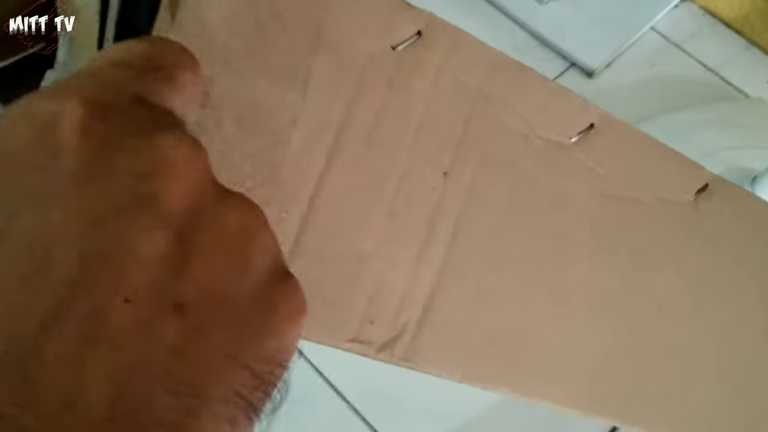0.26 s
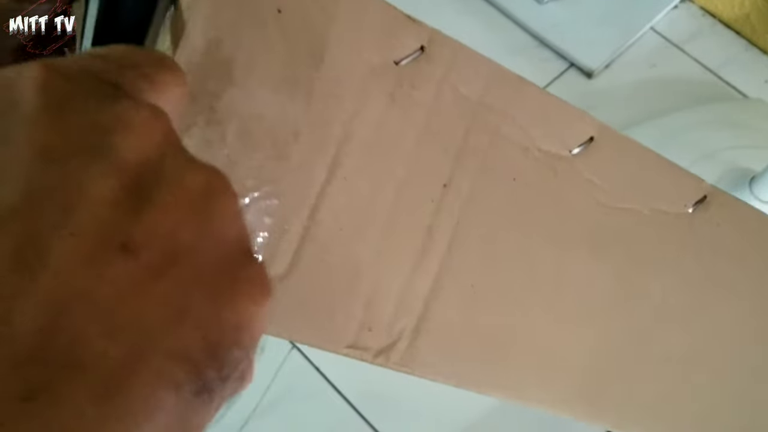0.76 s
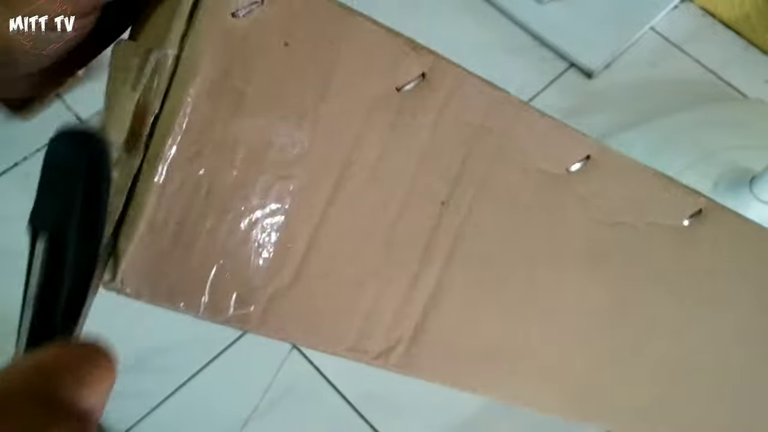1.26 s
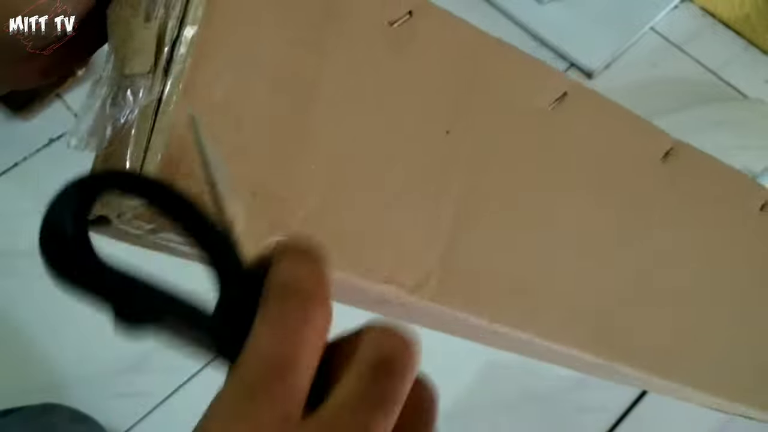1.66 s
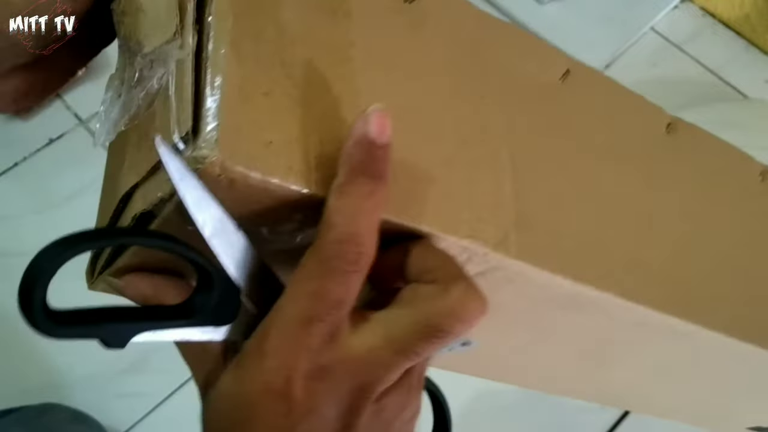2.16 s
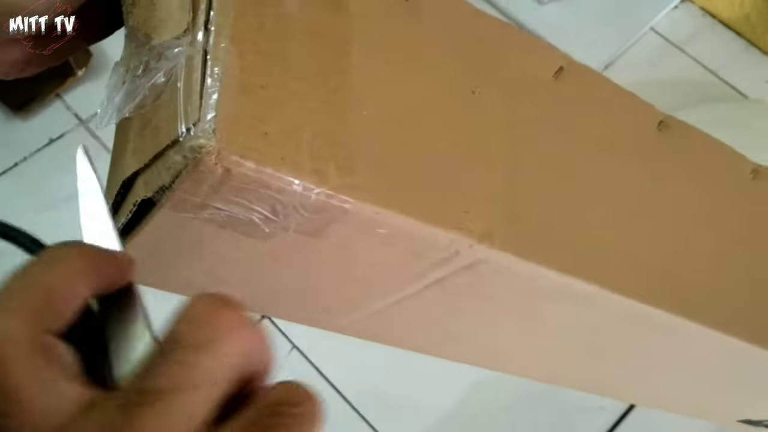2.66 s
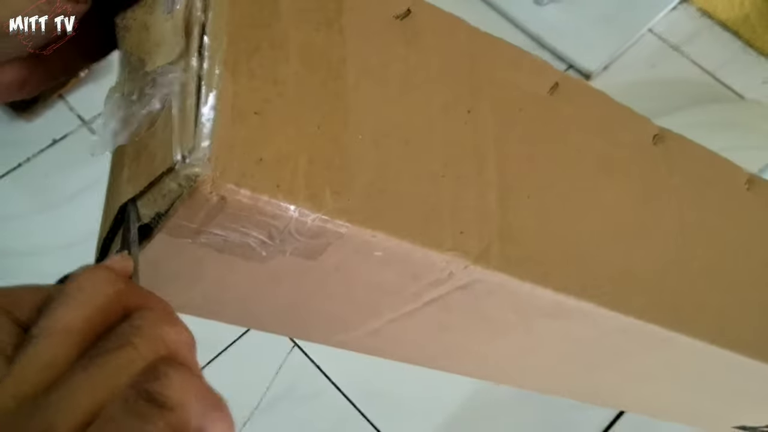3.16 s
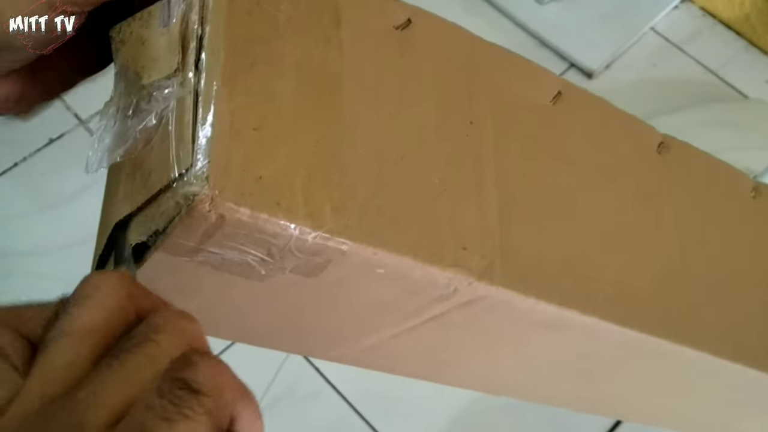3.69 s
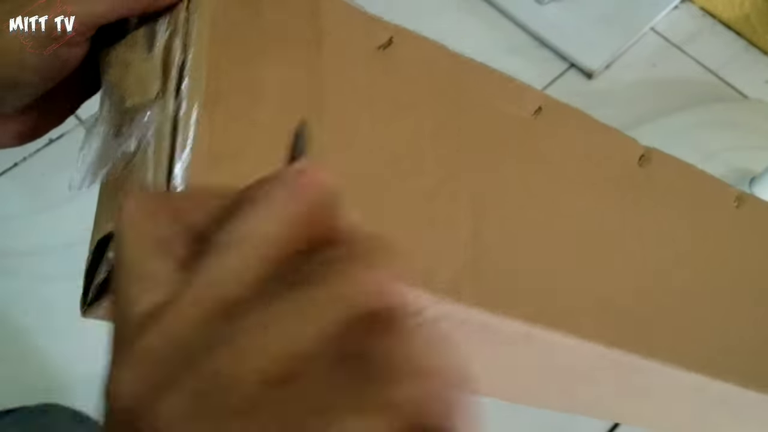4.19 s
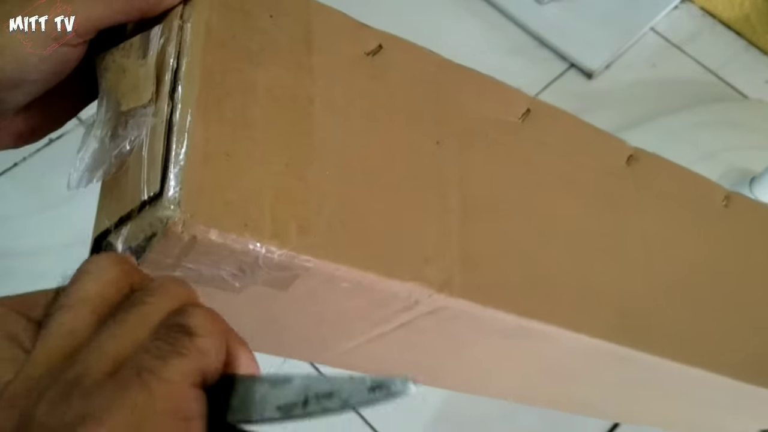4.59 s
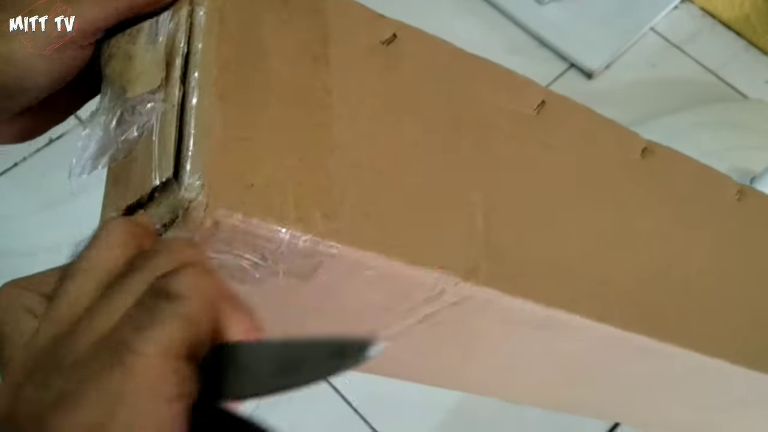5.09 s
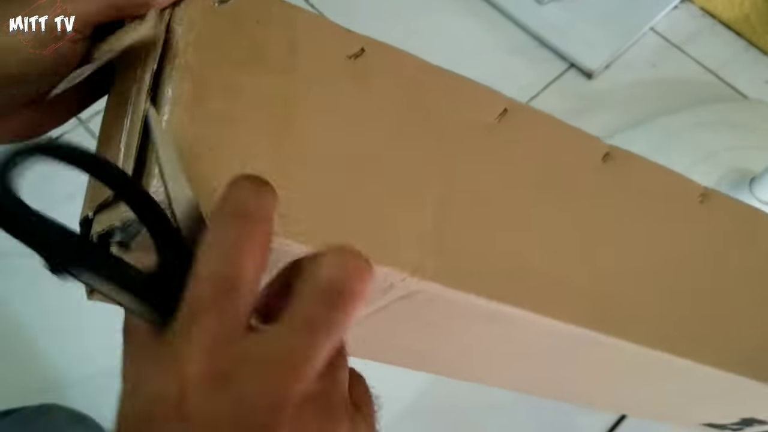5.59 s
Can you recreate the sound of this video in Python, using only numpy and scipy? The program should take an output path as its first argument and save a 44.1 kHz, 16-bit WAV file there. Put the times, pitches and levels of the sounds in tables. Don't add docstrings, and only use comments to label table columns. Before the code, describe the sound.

Scissors work at a taped cardboard box up close: hollow knocks, papery scrapes, crisp tape snaps and short rips in a tiled room.

```python
import sys
import numpy as np
from scipy import signal
from scipy.fft import rfft, irfft, next_fast_len
from scipy.io import wavfile
from scipy.ndimage import map_coordinates

SR = 44100
rng = np.random.default_rng(int(sys.argv[2]) if len(sys.argv) > 2 else 0)


def volts_from_db(level):
    exponent = np.asarray(level, float) / 20
    return 10 ** exponent


def store_pcm(level_fs):
    pcm = np.round(np.clip(level_fs, -1, 1) * 32767).astype(np.int16)
    wavfile.write(sys.argv[1], SR, np.atleast_2d(pcm).T)


N = 257984
SECONDS = np.arange(N) / SR


def unit(x):
    return x / np.sqrt(np.mean(x ** 2) + 1e-20)


def along(points, hz):
    f, v = np.transpose(points)
    return np.interp(np.log(hz + 1), np.log(f + 1), v)


def over_time(points):
    return np.interp(SECONDS, *np.transpose(points))


def wobble(rate):
    knots = rng.standard_normal(int(N * rate / SR) + 4)
    return map_coordinates(knots, [np.arange(N) * rate / SR])


def filtered(x, response):
    m = next_fast_len(N + SR // 2)
    return irfft(rfft(x, m) * response(np.fft.rfftfreq(m, 1 / SR)), m)[..., :N]


def coloured_noise(curve):
    return unit(filtered(rng.standard_normal((2, N)), lambda hz: volts_from_db(along(curve, hz))))


def resonances(modes):
    def response(f):
        total = 0
        for k, (centre, width, db) in enumerate(modes):
            damping = 1j * f * width
            total = total + (-1) ** k * volts_from_db(db) * damping / (centre ** 2 - f ** 2 + damping)
        return total
    return response


# frequency in Hz, correlation from -1 to 1.
PORT_LIKENESS = [(60, 1), (130, 0.88), (290, 0.8), (640, 0.36), (1410, -0.19), (3100, 0.16), (6820, -0.13),
                 (15000, 0.11)]


def diffuse(pair):
    def mid_side(hz):
        turn = np.arccos(np.clip(along(PORT_LIKENESS, hz), -1, 1)) / 2
        return np.array([np.cos(turn), np.sin(turn)])
    mid, side = filtered(pair, mid_side)
    return np.array([mid + side, mid - side])


# frequency in Hz, density in dB per Hz.
RUMBLE_SPECTRUM = [(15, -65), (25, -42), (29, -29), (35, -8.5), (60, 5), (112, -3.5), (134, -27),
                   (160, -65), (193, -6), (216, -24), (251, -15), (348, -39), (400, -31), (520, -52),
                   (880, -120)]
# frequency in Hz, density in dB per Hz.
HISS_SPECTRUM = [(180, -25), (300, 3.5), (537, -4.5), (749, -7), (1210, -6), (1460, -8), (2360, -10),
                 (3190, -15), (6100, -22.5), (16000, -20.5)]
# time in seconds, rumble level in dB.
RUMBLE_LEVEL = [
    (0, -50.5),
    (2.9, -52),
    (3.3, -52.5),
    (3.9, -52.5),
    (4.5, -55),
    (5.3, -48),
    (5.85, -52),
]


def background():
    rumble_swing_db, hiss_db = 1.4, -61.5
    swell = volts_from_db(over_time(RUMBLE_LEVEL) + rumble_swing_db * wobble(1.81))
    drift = volts_from_db(.6 * wobble(2.5))
    rumble = swell * coloured_noise(RUMBLE_SPECTRUM)
    hiss = volts_from_db(hiss_db) * drift * coloured_noise(HISS_SPECTRUM)
    return diffuse(rumble + hiss)


# frequency in Hz, t60 in seconds.
TILE_DECAY = [(100, 0.24), (500, 0.48), (2000, 0.36), (6000, 0.3), (14000, 0.25)]


def room(x):
    out, hop = np.zeros((2, N + 2 * SR)), SR // 4
    for start in range(0, N, hop):
        hz, t, z = signal.stft(rng.standard_normal((2, SR // 2)), SR, nperseg=256)
        decay = volts_from_db(-60 * t / along(TILE_DECAY, hz)[:, None])
        tail = signal.istft(z * decay, SR, nperseg=256)[1]
        wet = signal.fftconvolve(x[None, start:start + hop], tail / np.linalg.norm(tail[0]), axes=1)
        out[:, start + 130:][:, :wet.shape[1]] += wet
    return diffuse(out[:, :N])


# delay in seconds, left level in dB, right level in dB.
NEAR_ECHOES = [
    (.0011, -10, -28),
    (.0023, -21.5, -7),
    (.0037, -22, -56),
    (.0062, -19.5, -18),
]


def placed(x, lag, shade_share):
    side = np.array([[1], [-1]])
    shade_db = [(100, 0.32), (600, 0.32), (4000, 4.2), (12000, 1.3)]

    def response(hz):
        shade = volts_from_db(-side * shade_share * along(shade_db, hz))
        direct = shade * np.exp(-1j * np.pi * hz * lag * side)
        echoes = 0
        for s, left, right in NEAR_ECHOES:
            echoes = echoes + volts_from_db([[left], [right]]) * np.exp(-2j * np.pi * hz * (s + side * 0.000215))
        treble = hz / (hz + 900)
        return direct + treble * echoes
    return filtered(x, response)


# frequency in Hz, width in Hz, level in dB.
CAVITY_MODES = [(113.2, 23.5, 3), (185, 35, 1.5), (250, 25, -2.5)]
# frequency in Hz, width in Hz, level in dB.
WALL_MODES = [(317.4, 157, 1.5), (425, 76, 7), (559.4, 60, 3.5), (733, 102, 2), (940, 104, -7.5)]
# frequency in Hz, width in Hz, level in dB.
PAPER_MODES = [(1060, 630, 5), (1413, 550, 9), (1740, 390, 7), (2455, 420, -2), (3200, 1500, -16)]
# start in seconds, peak in dB, wall pitch in Hz, t60 in seconds, fingertip tap in dB.
WALL_KNOCKS = [(0.294, -43.5, 744, 0.021, 0), (0.627, -42.5, 380, 0.081, -8), (0.757, -38, 390, 0.014, 1),
               (1.101, -25.5, 1165, 0.032, -22), (1.209, -31, 947, 0.049, -20),
               (1.349, -22.5, 351, 0.022, -7), (1.963, -28, 308, 0.0042, 1), (2.072, -39.5, 180, 0.075, -7),
               (2.448, -35.5, 425, 0.0073, 2.5), (3.045, -48.5, 192, 0.017, 2),
               (3.105, -38, 180, 0.014, -10), (3.615, -36, 354, 0.0083, -0.5), (4.148, -27, 246, 0.072, -6),
               (4.172, -21.5, 452, 0.058, 1.5), (4.219, -21, 160, 0.047, -6.5), (4.288, -25, 278, 0.054, 4),
               (4.635, -62, 593, 0.016, 6), (4.9, -33, 420, 0.036, -16), (5.254, -28.5, 175, 0.12, 1.5),
               (5.268, -20, 582, 0.037, -0.5), (5.301, -50, 188, 0.025, -15),
               (5.567, -31.5, 463, 0.0038, -2), (5.802, -38, 250, 0.12, -20.5)]


def knocks():
    out, shake, t = np.zeros(N + SR), np.zeros(N + SR), np.arange(SR // 4) / SR
    rattle_db, rattle_t60_s = -0.5, 0.012
    contact = np.clip((t - .0008) / 0.001895, 0, 1)
    push = 1.62 * np.sin(2 * np.pi * contact) * (0.33 + 0.84 * contact)
    nail = 0.46 * np.exp(-((t - .001) / 0.0001) ** 2)
    tap = push + nail
    stiff = 0.0007 * (1 - np.exp(-t / 0.0013))
    noises = rng.standard_normal((len(WALL_KNOCKS), len(t)))
    for (s, db, hz, t60, tap_db), noise in zip(WALL_KNOCKS, noises):
        fade = volts_from_db(-60 * t / max(t60, .004)) * (1 - np.exp(-t / 0.00093))
        bend = np.sin(2 * np.pi * hz * (t + stiff))
        at = round(s * SR)
        out[at:][:len(t)] += volts_from_db(db + 1) * (fade * bend + volts_from_db(tap_db) * tap)
        shake[at:][:len(t)] += volts_from_db(db + rattle_db - 60 * t / rattle_t60_s) * noise
    rattle = filtered(shake[:N], resonances(CAVITY_MODES + WALL_MODES + PAPER_MODES[:2]))
    return out[:N] + rattle


def snaps(rows):
    out, t = np.zeros(N + SR), np.arange(SR // 20) / SR
    lead_in_s, t60_s = .0007, 0.0054
    top_end = signal.butter(2, [8800, 15500], "band", fs=SR)
    lead_in = np.clip(t / lead_in_s, 0, 1) ** 2
    fade = lead_in * volts_from_db(-60 * np.clip(t - lead_in_s, 0, 1) / t60_s)
    noises = rng.standard_normal((len(rows), 2, len(t)))
    for (s, db, hz, top_db), (jitter, fray) in zip(rows, noises):
        around_pitch = signal.butter(1, np.multiply((.6, 1.9), hz), "band", fs=SR)
        release = 0.44 * fade * fray
        release[round(lead_in_s * SR)] += 2
        flick = 0.41 * fade * np.sin(2 * np.pi * hz * t + 0.29 * np.cumsum(jitter))
        click = signal.lfilter(*around_pitch, release)
        click += volts_from_db(top_db + 7) * signal.lfilter(*top_end, release)
        out[round((s - .0003) * SR):][:len(t)] += volts_from_db(db + 4.0) * (flick + click)
    return out[:N]


# start in seconds, peak in dB, pitch in Hz, top-end level in dB.
FACE_CREAKS = [
    (0.2944, -42, 2450, -13),
    (0.7456, -34, 2260, -23),
    (1.4194, -28, 2330, -29),
    (1.721, -40, 2340, -11),
    (1.805, -41, 2370, -11),
    (1.9165, -37, 3680, -30),
    (4.0921, -44, 2330, -3.5),
    (5.1753, -37.5, 2840, -23),
]


def face_creaks():
    return snaps(FACE_CREAKS)


# start in seconds, peak in dB,
# film pitch in Hz, top-end level in dB.
FILM_SNAPS = [(0.9642, -45, 2240, 0), (1.0251, -27, 2230, -18), (1.053, -36, 4600, -13),
              (1.1014, -37, 2350, -20), (1.21, -32.5, 2600, -9), (1.2434, -27.5, 4600, -10.5),
              (1.2682, -21, 4380, -28), (1.2724, -27.5, 4040, -1.5), (1.3205, -33, 4030, -21),
              (2.1372, -38.5, 5530, -5), (2.1497, -40, 5400, -4), (2.205, -35, 2700, -10),
              (2.2502, -49, 2310, 14.5), (2.4474, -40, 4500, -20), (4.153, -34, 5370, -14),
              (4.1729, -30, 5900, -17), (4.1805, -17, 4250, -21), (4.905, -36, 3620, -32),
              (4.9374, -36, 4250, -19), (5.2555, -22.5, 3520, -11), (5.2722, -27.5, 5130, -3),
              (5.2763, -19, 4500, -21), (5.2782, -23.5, 4840, -16),
              (0.2226, -46, 2440, -23), (1.495, -21, 3480, -20), (1.6646, -49, 5400, -12),
              (1.842, -37.5, 3760, -12), (2.4, -29.5, 3800, -10.5), (2.7563, -40.5, 3700, -27),
              (3.106, -50, 2710, -1), (3.324, -47.5, 4050, -23), (4.777, -32.5, 3940, -22),
              (5.1194, -34, 3890, -30), (5.4496, -32, 4400, -6.5), (5.5371, -41.5, 5000, -24),
              (5.567, -47, 2250, -32), (5.7797, -39.5, 3480, -11), (5.8158, -39, 3120, -30)]


def tape_cracks():
    return snaps(FILM_SNAPS)


def grit(slips, spread_db, smooth):
    when, size = rng.random(N), rng.standard_normal((2, N))
    struck = when < slips / SR * volts_from_db(5 * wobble(60))
    slip = struck * volts_from_db(spread_db * np.clip(size[0], -2, 2)) * np.sign(size[1])
    return unit(unit(slip) + smooth * rng.standard_normal(N))


# time in seconds, pressure in dB.
GRIP_PRESSURE = [(0, -61.5), (.5, -65.5), (.9, -59.5), (1.5, -65.5), (1.95, -63), (2.3, -56.5),
                 (2.6, -68.5), (3.45, -70), (3.95, -63), (4.6, -69), (5.1, -60.5), (5.85, -63)]
# middle in seconds, half-width in seconds, walls in dB, boom over walls in dB.
HAND_RUBS = [(.2, 0.029, -59, 6), (.62, 0.07, -58.5, 1), (.99, 0.08, -44.5, -12), (1.06, 0.073, -44, 0.5),
             (1.22, 0.095, -44.5, -2), (1.36, 0.042, -55, 18.5), (1.43, 0.043, -54, -3),
             (1.98, 0.018, -62, 23.5), (2.13, 0.046, -54, 4), (2.27, .06, -62, -9), (2.44, 0.07, -54.5, -1),
             (3.07, 0.083, -60.5, 12), (3.62, 0.034, -65, 17), (3.81, 0.036, -49.5, -3),
             (4.16, 0.05, -42, -3), (4.22, .03, -55, 24.5), (4.3, 0.044, -57, 2), (4.43, .07, -55.5, 6),
             (4.67, 0.079, -63.5, 13), (4.89, 0.076, -54.5, 2.5), (4.94, 0.034, -62, 15),
             (5.28, 0.027, -49, 21), (5.41, 0.057, -53.5, -14), (5.52, 0.03, -63, -13),
             (5.84, 0.017, -59, 21)]
# middle in seconds, half-width in seconds, rasp in dB, hiss over rasp in dB.
FLAT_SCRAPES = [
    (.66, 0.028, -56.5, -21),
    (1.29, 0.12, -51.5, -17),
    (3.664, 0.027, -50, -0.5),
    (3.786, 0.056, -41.5, -7),
    (5.83, 0.024, -53, -21),
]
# start in seconds, length in seconds, walls in dB, hiss over walls in dB.
SUDDEN_RIPS = [(0.284, 0.032, -48, -16.5), (0.638, 0.043, -45.5, -24), (0.744, 0.021, -39.5, -14),
               (0.949, 0.035, -44.5, -7), (1.009, 0.028, -36, -6.5), (1.1, 0.016, -36.5, -9),
               (1.2, 0.029, -50, 2.5), (1.228, 0.069, -37, -6.5), (1.295, 0.063, -41, 0),
               (1.502, 0.098, -76, 14), (1.894, 0.069, -75.5, 17.5), (2.127, 0.063, -52.5, 0.5),
               (2.215, 0.045, -45, -5.5), (2.451, 0.0092, -50.5, 8.5), (3.099, 0.017, -45.5, -12),
               (3.72, 0.02, -47.5, -23), (4.136, 0.024, -37.5, -17), (4.167, 0.046, -33.5, -2.5),
               (4.622, 0.073, -46, -17), (4.898, 0.014, -40.5, -19), (4.918, 0.021, -38.5, -10),
               (5.244, 0.037, -29.5, -9), (5.295, 0.047, -46.5, -9), (5.452, 0.1, -74.5, 11),
               (5.557, 0.014, -45, -7), (5.797, 0.029, -45, -13)]


def strokes():
    t = np.arange(0, N, 16) / SR
    grip_layers = np.array([[7], [0], [-4.5], [-7]])
    power = volts_from_db(np.interp(t, *np.transpose(GRIP_PRESSURE)) + grip_layers) ** 2
    for s, width, db, boom_db in HAND_RUBS:
        layers = np.array([[boom_db], [0], [-4.5], [-13.5]])
        power += volts_from_db(db + layers) ** 2 * np.exp(-2 * ((t - s) / width) ** 2)
    for s, width, db, hiss_db in FLAT_SCRAPES:
        layers = np.array([[-1], [0], [hiss_db]])
        power[1:] += volts_from_db(db + layers) ** 2 * np.exp(-3 * ((t - s) / width) ** 4)
    for s, length, db, hiss_db in SUDDEN_RIPS:
        rise_s, let_go_s = 0.0036 + 0.24 * length, 0.0025
        joining = np.array([[1], [1], [2.7]])
        start = np.clip((t - s) / rise_s, 0, 1) ** joining
        shape = start * np.exp(-np.clip(t - s - length, 0, 1) / let_go_s)
        rasp_db = 0.5 + 0.73 * hiss_db
        power[1:] += volts_from_db(db + np.array([[0], [rasp_db], [hiss_db]])) ** 2 * shape
    return [np.interp(SECONDS, t, gain) for gain in np.sqrt(power)]


# frequency in Hz, density in dB per Hz.
FILM_SPECTRUM = [(1470, -14), (2500, 8.5), (4370, -2.5), (6150, -4.5), (8140, -14.5), (8870, -6.5),
                 (10800, -5.5), (14200, -8), (16000, -56)]
# frequency in Hz, width in Hz, level in dB.
BLADE_RING = [(4400, 136, -3.5)]


def drag():
    boom, walls, rasp, hiss = strokes()
    tremble = volts_from_db(1.5 * wobble(45))
    coarse = grit(400, spread_db=5.0, smooth=1.49)
    fine = grit(1200, spread_db=6, smooth=.6)
    cavity = boom * unit(filtered(coarse, resonances(CAVITY_MODES)))
    cardboard = walls * unit(filtered(coarse, resonances(WALL_MODES)))
    paper = rasp * unit(filtered(coarse + fine, resonances(PAPER_MODES)))
    steel = resonances(BLADE_RING)
    film = hiss * unit(filtered(fine, lambda hz: volts_from_db(along(FILM_SPECTRUM, hz)) + steel(hz)))
    return volts_from_db(-3.0) * tremble * (cavity + cardboard + paper + film)


def scene():
    cracks, creaks, cut, blows = tape_cracks(), face_creaks(), drag(), knocks()
    edge = placed(cut + cracks, lag=8 / SR, shade_share=0.93)
    face = placed(blows + creaks, lag=4 / SR, shade_share=.3)
    send = cut + blows + volts_from_db(-6) * (cracks + creaks)
    send_db = [(100, -5), (1000, -5.5), (10000, 0.5)]
    bright = filtered(send, lambda hz: volts_from_db(along(send_db, hz)))
    return edge + face + room(bright) + background()


def band_limit(x):
    return signal.sosfilt(signal.butter(12, 16510, fs=SR, output="sos"), x)


def record(dry):
    edges_db = [(25, -30), (48, 0.0), (15400, -0.5), (15600, -20), (17000, -41)]

    def microphone(hz):
        notch = 1 - 0.21 * np.exp(-((hz - 8100) / 750) ** 2)
        return notch * volts_from_db(along(edges_db, hz))
    return band_limit(filtered(dry, microphone))


dry = scene()
out = record(dry)
store_pcm(out)
```